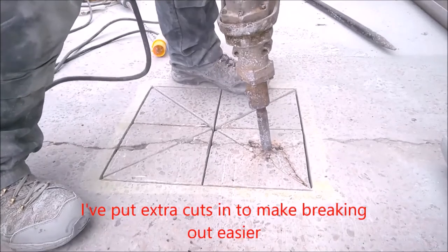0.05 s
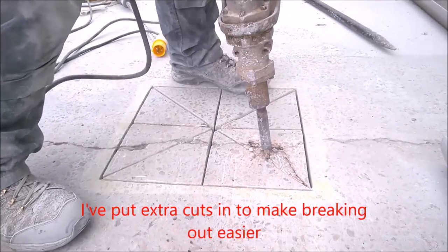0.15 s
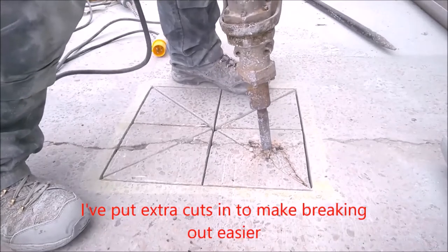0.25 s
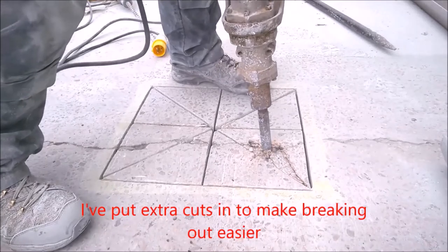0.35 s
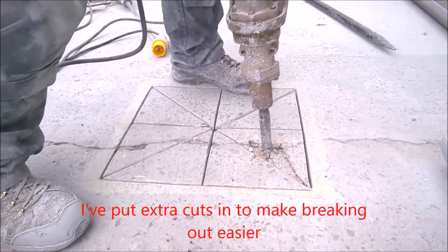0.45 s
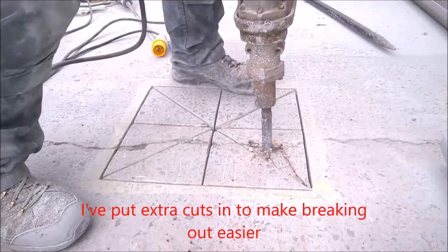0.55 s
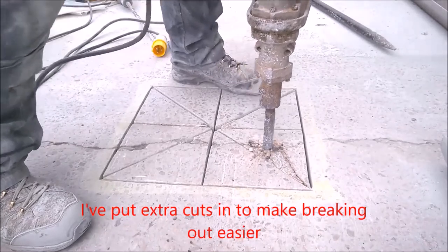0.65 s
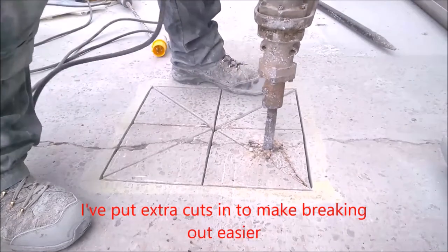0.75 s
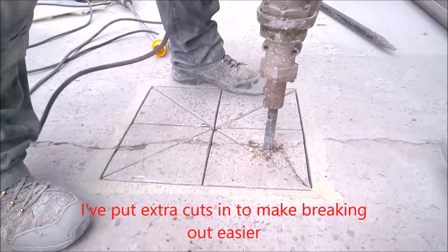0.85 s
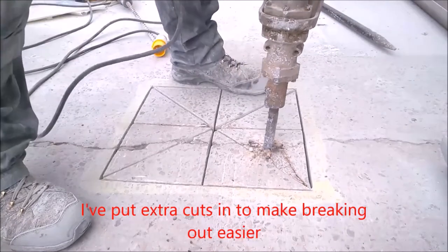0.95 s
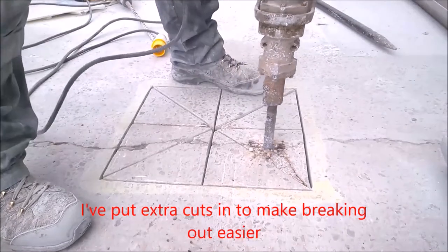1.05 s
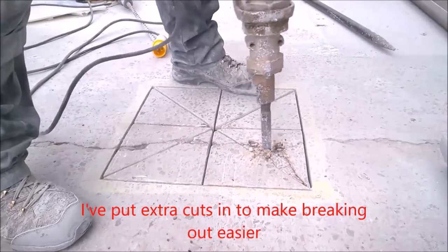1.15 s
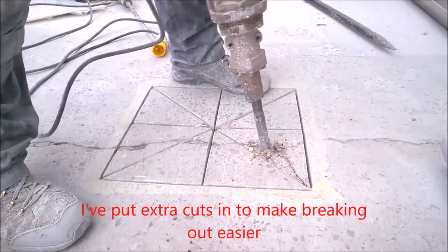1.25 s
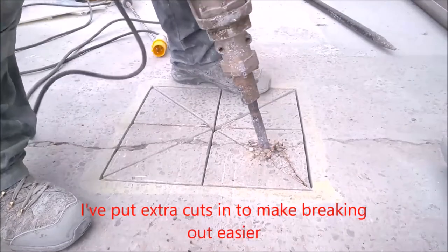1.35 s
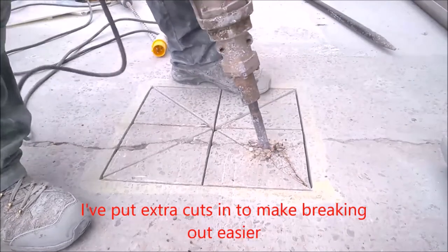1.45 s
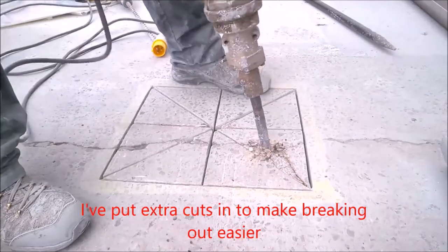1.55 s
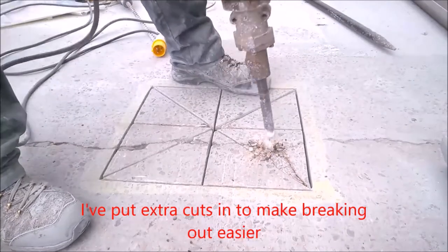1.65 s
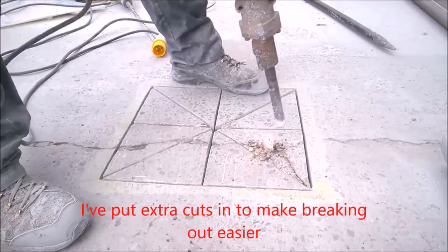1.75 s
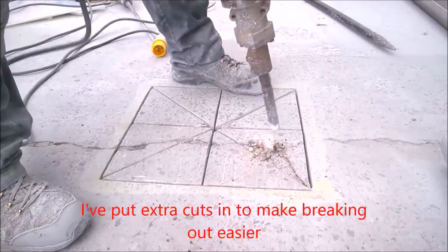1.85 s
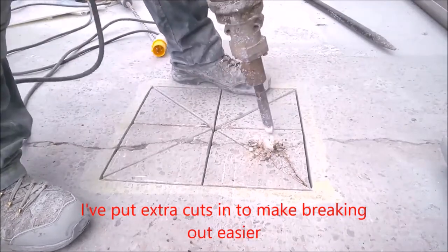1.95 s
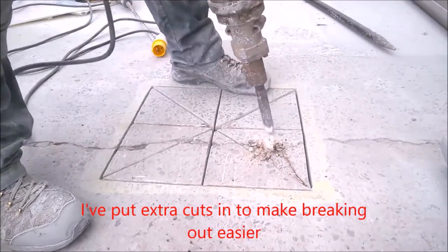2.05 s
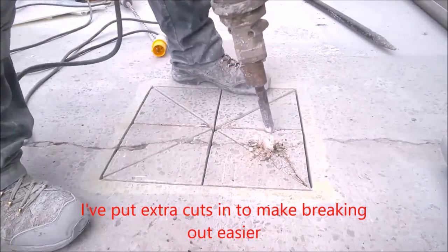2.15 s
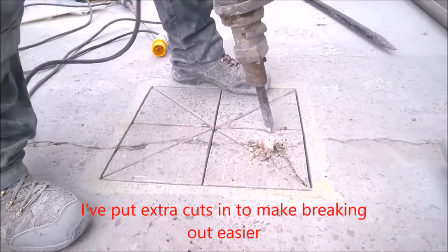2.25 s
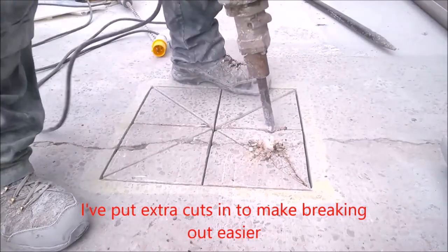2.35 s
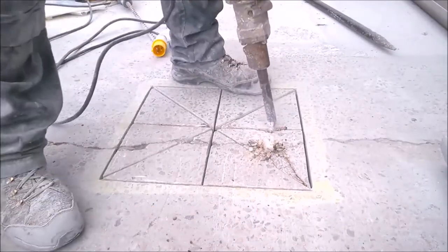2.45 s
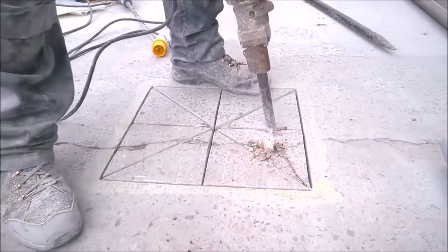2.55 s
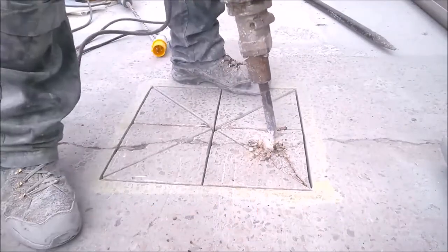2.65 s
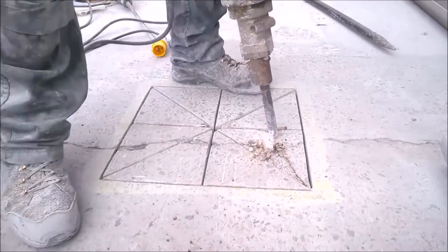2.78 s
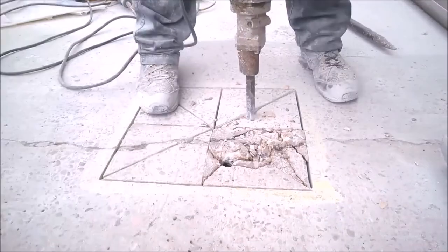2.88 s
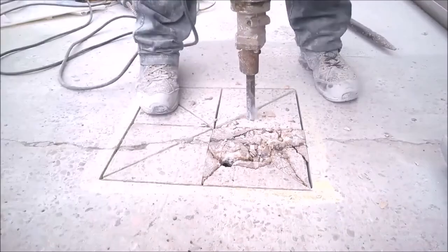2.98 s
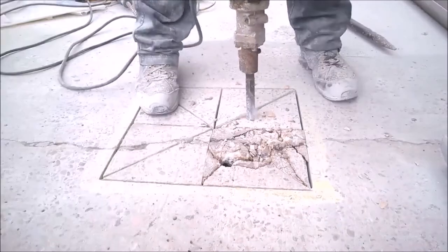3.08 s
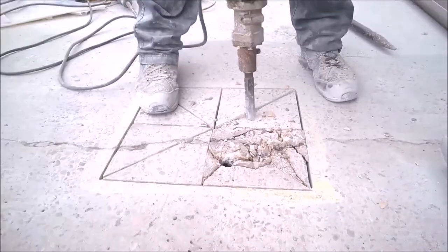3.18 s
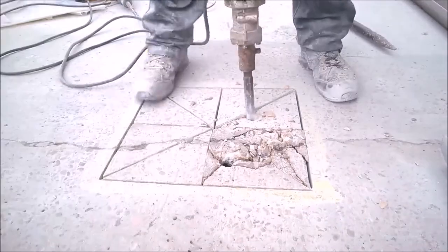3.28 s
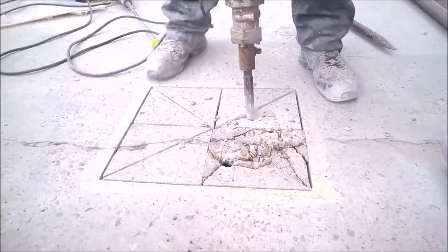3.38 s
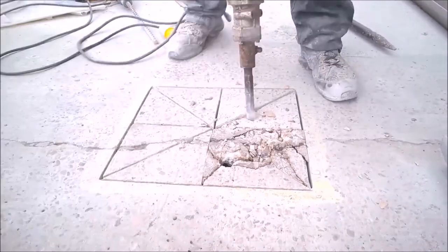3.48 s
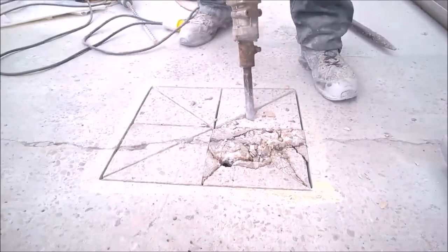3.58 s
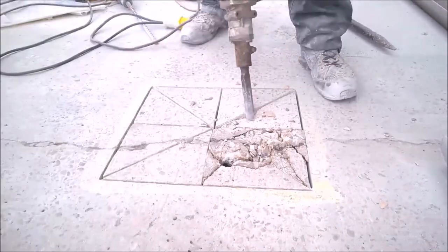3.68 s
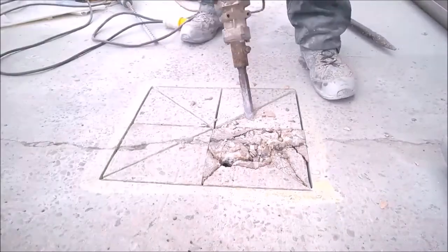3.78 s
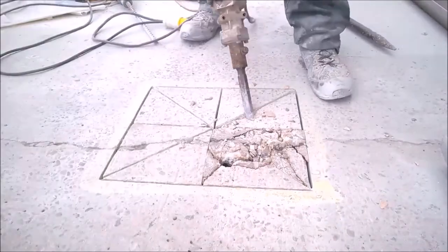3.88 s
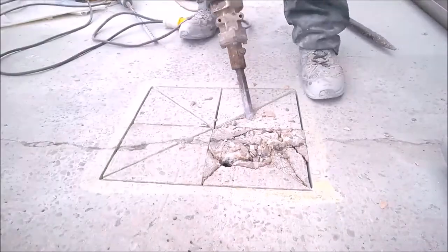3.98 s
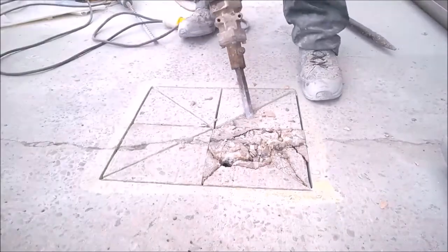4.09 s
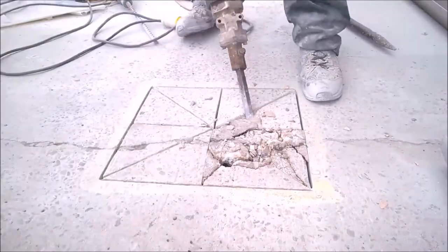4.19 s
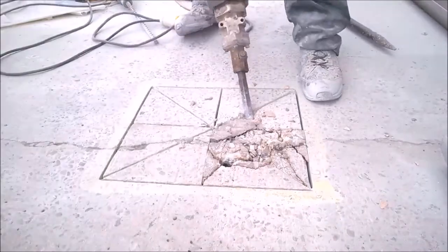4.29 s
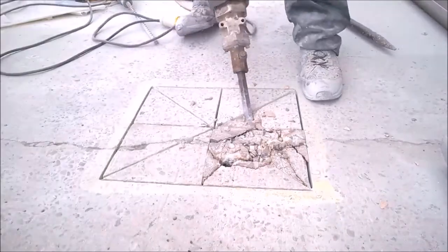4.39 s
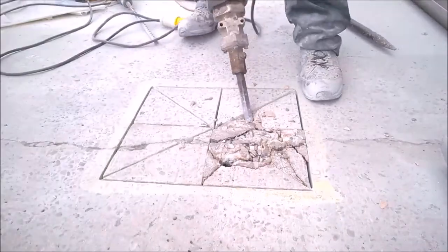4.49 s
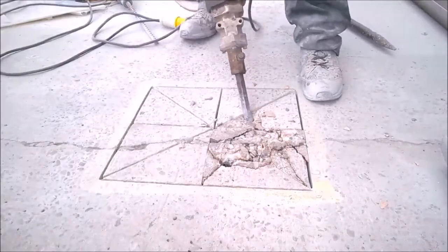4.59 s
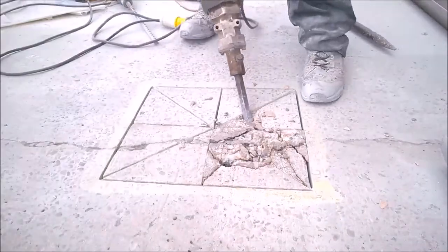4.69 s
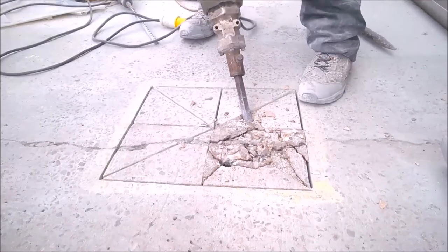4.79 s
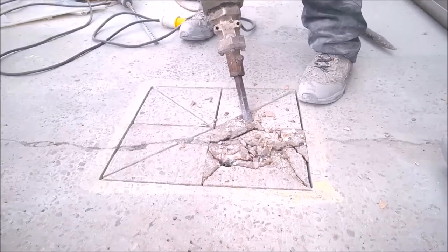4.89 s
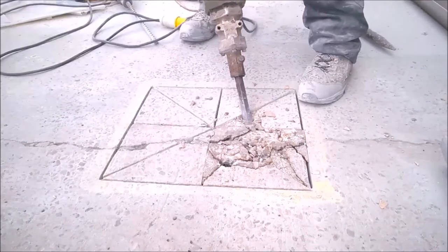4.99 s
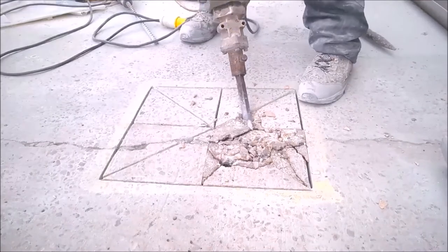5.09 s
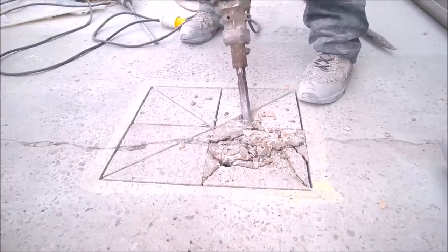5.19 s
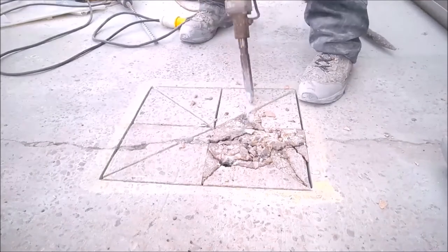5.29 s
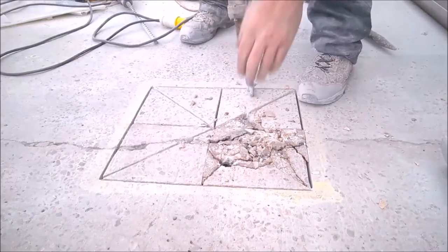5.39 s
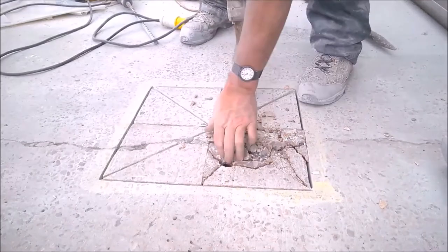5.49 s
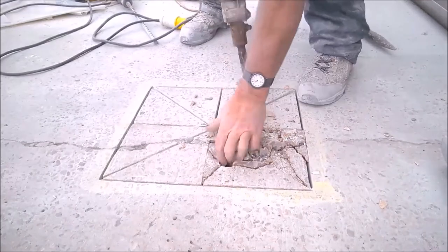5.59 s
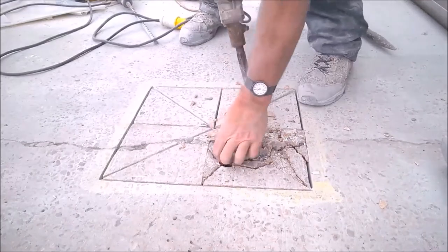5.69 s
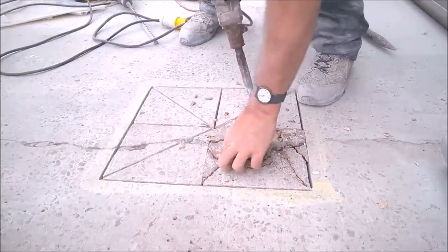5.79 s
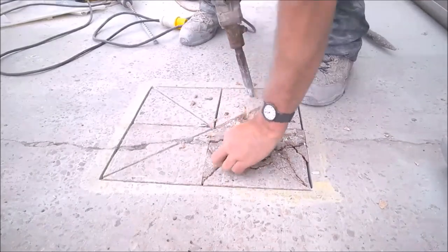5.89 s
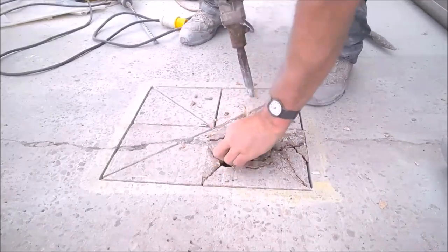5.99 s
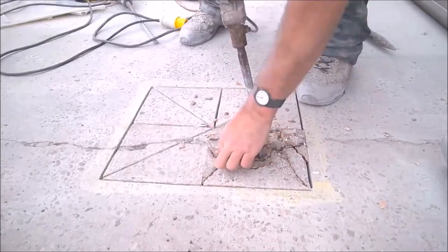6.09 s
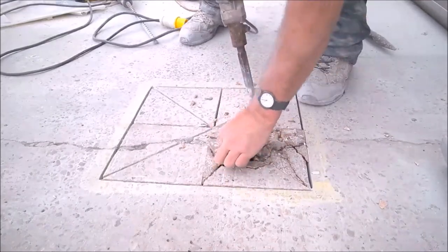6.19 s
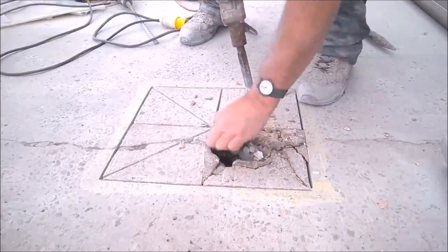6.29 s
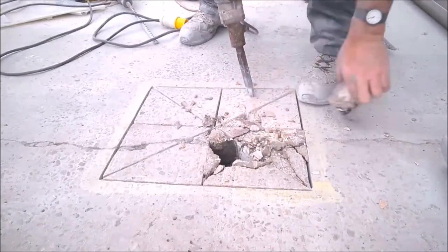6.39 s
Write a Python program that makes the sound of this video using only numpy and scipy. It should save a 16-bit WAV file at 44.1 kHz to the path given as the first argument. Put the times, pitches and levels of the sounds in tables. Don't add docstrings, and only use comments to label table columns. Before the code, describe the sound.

An electric breaker hammers concrete in rapid hard cracks, rattling and whining, falters, hammers again, runs down, then chisel bounces and faint rubble scrapes.

```python
import sys
import numpy as np
from scipy import signal
from scipy.fft import rfft, irfft
from scipy.io import wavfile
from scipy.ndimage import uniform_filter1d

SR = 44100
rng = np.random.default_rng(int(sys.argv[2]) if len(sys.argv) > 2 else 0)


def convert_level_to_amplitude(level_db):
    exponent = np.asarray(level_db, float) / 20
    return 10 ** exponent


def wrap_up_sound(samples):
    columns = np.atleast_2d(samples).T
    tamed = np.clip(columns, -1, 1)
    steps = np.round(tamed * 32767).astype(np.int16)
    wavfile.write(sys.argv[1], SR, steps)


N = 284004

# (time [s], push into the slab [dB], casing shake [dB], dust and fan [dB])
LEAN = [(0, -31, -25.5, -25.5), (1.33, -29.5, -24, -25), (1.45, -44, -27, -23), (1.62, -46, -23.5, -23.5),
        (1.75, -69.5, -26.5, -35), (1.95, -61.5, -31, -31), (2.03, -41.5, -23.5, -20),
        (2.2, -45.5, -28.5, -23), (2.42, -38.5, -32.5, -20), (2.48, -63, -34.5, -35),
        (2.8, -52.5, -34.5, -37), (2.9, -37.5, -31.5, -44), (3.0, -39.5, -38, -28), (4.15, -39, -37, -32),
        (5.0, -47, -37.5, -55.5), (5.2, -46, -49, -59), (5.38, -66, -49, -60), (5.75, -100, -99, -79)]
# (frequency [Hz], level [dB per Hz])
RATTLE_SPECTRUM = [(250, -47.5), (450, -12), (1150, -5), (1800, -2), (3800, -7.5), (6000, -13),
                   (8000, -38.5), (13000, -90.5)]


def evened(x):
    return x / np.sqrt(np.mean(x ** 2) + 1e-20)


def read_spectrum(points, hz):
    f, value = np.transpose(points)
    return np.interp(np.log(hz + 1), np.log(f + 1), value)


def add(mix, s, sound):
    part = mix[..., round(s * SR):][..., :sound.shape[-1]]
    part += sound[..., :part.shape[-1]]


def along(rows, order):
    rows = np.array(rows)
    return np.interp(np.arange(N) / SR, rows[:, 0], rows[:, order])


def spells(rows, t, edge_db_per_s):
    levels = []
    for start, end, db in rows:
        outside = np.maximum(np.maximum(start - t, t - end), 0)
        levels.append(db - edge_db_per_s * outside)
    return np.max(levels, axis=0)


def noise(points):
    # (frequency [Hz], likeness [0-1])
    likeness = [(50, .2), (300, 0.84), (2000, 0.69), (5000, 0.28), (14000, .05)]
    hz = np.fft.rfftfreq(N, 1 / SR)
    a, b = rfft(rng.standard_normal((2, N)))
    same = np.clip(read_spectrum(likeness, hz), 0, 1)
    stereo = np.array([a, same * a + np.sqrt(1 - same ** 2) * b])
    return evened(irfft(stereo * convert_level_to_amplitude(read_spectrum(points, hz)), N))


def resonate(x, hz, width_hz):
    turn = np.exp(2j * np.pi * np.cumsum(hz * np.ones(x.shape[-1])) / SR)
    r = np.exp(-np.pi * width_hz / SR)
    return 2 * (turn * signal.lfilter([1 - r], [1, -r], x / turn)).real


def decays(impulses, seconds):
    return signal.lfilter([1], [1, -np.exp(-1 / (seconds * SR))], impulses)


def train(rows, db):
    out = np.zeros(N)
    out[(np.array(rows)[:, 0] * SR).astype(int)] = convert_level_to_amplitude(db)
    return out


def piston():
    # (first blow [s], last blow [s], blows [count])
    runs = [(.0034, .9885, 33), (1.017, 1.2355, 8), (1.2654, 1.3253, 3), (1.3612, 1.6216, 11),
            (1.644, 1.8121, 8), (1.8371, 1.9384, 5), (1.9628, 1.9838, 2), (2.0172, 2.0721, 3),
            (2.104, 2.2277, 5), (2.9377, 2.9646, 2), (2.9971, 3.1946, 8), (3.2245, 3.3138, 4),
            (3.3413, 3.485, 6), (3.5159, 3.5473, 2), (3.5728, 3.7189, 6), (3.7499, 4.1748, 15),
            (4.2072, 4.2731, 3), (4.3005, 4.3923, 4), (4.4207, 4.535, 5), (4.5594, 4.8982, 13)]
    # (first blow [s], last blow [s], blows [count])
    coasts = [
        (2.2591, 2.4165, 5),
        (4.9276, 5.2778, 10),
    ]
    # (time [s], crack peak [dB], top chisel ring [dB])
    bite = [(0, -10, -27), (.55, -11.5, -28), (.66, -15.5, -34.5), (.99, -18.5, -33.5),
            (1.03, -21.5, -23.5), (1.43, -10.5, -22), (1.65, -7.5, -28.5), (1.96, -8.5, -35.5),
            (2.0, -15, -24), (2.35, -6, -18.5), (3.3, -5, -23.5), (3.5, -8.5, -14.5), (3.78, -6.5, -22),
            (3.95, -10.5, -15.5), (4.3, -14.5, -18), (4.42, -7, -20.5), (4.82, -10, -25.5),
            (5.0, -5, -22.5)]
    # (time [s], crack peak [dB], top chisel ring [dB])
    odd_blows = [(0.0348, -9, -14.5), (0.5885, -10, -11), (0.6189, -2, -30.5), (1.1744, -29, -26),
                 (1.7875, -3.5, -38), (2.0724, -6, -15.5), (2.373, -16.5, -13), (2.471, -4, -34),
                 (2.5151, -5, -38), (2.5617, -4, -30), (2.6155, -4.5, -36), (2.6692, -4.5, -29),
                 (2.7178, -21, -24), (2.7667, -28.5, -44.5), (2.7967, -21.5, -52), (2.849, -2.5, -12.5),
                 (2.9176, -5.5, -18), (3.026, -8, -16), (3.254, -4.5, -15.5), (3.3701, -7, -9),
                 (3.457, -3, -10), (3.6904, -12, -14), (3.9941, -8, -14.5), (4.0544, -31.5, -24),
                 (4.1125, -9, -12), (4.1757, -10.5, -34.5), (4.6712, -3.5, -15), (5.1785, -12, -25),
                 (5.2775, -7.5, -10), (5.391, -5, -38)]
    slowing = 45
    crack_scatter_db, ring_scatter_db, jitter_s = 1.8, 3, .0005

    times = [np.linspace(first, last, count) for first, last, count in runs]
    for first, last, count in coasts:
        span = last - first
        rate = (count - 1) / span + slowing * span / 2
        times.append(first + (rate - np.sqrt(rate ** 2 - 2 * slowing * np.arange(count))) / slowing)
    s = np.concatenate(times)
    at, crack_db, ring_db = np.transpose(bite)
    chance = np.clip(rng.standard_normal((len(s), 3)), -1.5, 1.5)
    crack = np.interp(s, at, crack_db) + crack_scatter_db * chance[:, 0]
    ring = np.interp(s, at, ring_db) + ring_scatter_db * chance[:, 1]
    blows = np.c_[s + jitter_s * chance[:, 2], crack, ring]
    odd = np.array(odd_blows)
    clear = abs(s[:, None] - odd[:, 0]).min(axis=1) > .01
    blows = np.r_[blows[clear], odd]
    return blows[np.argsort(blows[:, 0])]


def shank(s):
    # (start [s], end [s], level [dB])
    middle_spells = [
        (1.12, 1.23, -42),
        (2.17, 2.19, -37),
        (2.36, 2.42, -33.5),
        (2.91, 2.93, -38),
        (3.92, 4.04, -32.5),
        (5.28, 5.3, -43.5),
    ]
    # (start [s], end [s], level [dB])
    length_spells = [
        (1.18, 1.22, -28.5),
        (1.68, 2.1, -22.5),
        (2.12, 2.15, -26.5),
        (2.35, 2.45, -26.5),
        (2.47, 2.69, -18),
        (2.85, 2.87, -20.5),
        (2.91, 2.93, -18.5),
        (3.75, 3.88, -31),
        (4.0, 4.12, -34.5),
        (5.39, 5.41, -18),
    ]
    edge_db_per_s, middle_rest_db, length_rest_db = 500, -53.5, -40.5
    middle_db = max(spells(middle_spells, s, edge_db_per_s), middle_rest_db)
    length_db = max(spells(length_spells, s, edge_db_per_s), length_rest_db)
    octave_db = np.interp(s, (1, 2.4), (-25.5, -45))
    return middle_db, length_db, octave_db


def chisel(blows):
    # (frequency [Hz], level [dB], decay t60 [s])
    top_ring = [(9650, -6, 0.07), (9830, -4, 0.08), (13915, -20, .06), (9965, -12, .05)]
    middle_ring = [(6270, 16.5, 0.39), (8100, -21.5, .05)]
    length_ring = [(2020.5, 2.5, 0.11), (2098, -6, .11)]
    octave_ring = [(4170, 0.0046, 0.3)]
    octave_scatter_db = 9

    out = np.zeros((2, N))
    gaps = np.append(np.diff(blows[:, 0]), .03)
    for (s, crack_db, top_db), gap in zip(blows, gaps):
        t = np.arange(round(min(gap, .06) * SR)) / SR
        free_s = min(gap * rng.uniform(.3, .7), .022)
        edge = np.clip(t / 0.0026, 0, 1) * np.clip((t[-1] - t) / .002, 0, 1)
        choked_db = -1700 * np.maximum(t - free_s, 0)
        top_db -= 5.8 * max(crack_db - 13.0 - top_db, 0)
        middle_db, length_db, octave_db = shank(s + .01)
        octave_db -= octave_scatter_db * 2 * (rng.random() - .3)
        groups = [(top_ring, top_db + 4.0), (middle_ring, middle_db + 0.1),
                  (length_ring, length_db + 2.5), (octave_ring, octave_db - 1.5)]
        for modes, ring_db in groups:
            if modes is length_ring and s == blows[-1, 0]:
                ring_db = ring_db - 1200 * t
            for hz, db, t60 in modes:
                phase, apart, share, load = rng.random(4)
                hz *= 1 + 0.011 * (load - .5)
                spread = .5 * (apart - .5) * min(hz / 4000, 1.8)
                turn = 2 * np.pi * (hz * t + phase + np.array([[0], [spread]]))
                level_db = ring_db + db + 6 * (share - .5) - 60 * t / t60 + choked_db * (hz > 5000)
                add(out, s, convert_level_to_amplitude(level_db) * edge * np.sin(turn))
    scuffed = 1 + 0.58 * evened(uniform_filter1d(rng.standard_normal(N), 40))
    return out * scuffed


def lifted():
    starts_db, leaves_db = -47, -51
    return np.clip((along(LEAN, order=1) - starts_db) / (leaves_db - starts_db), 0, 1)


def loose_db():
    # (start [s], end [s], knock [dB])
    loose_block = [
        (4.55, 4.85, -32.5),
        (4.85, 5.2, -36.5),
    ]
    t = np.arange(N) / SR
    return spells(loose_block, t, 28) - 150 * np.maximum(t - loose_block[-1][1], 0)


def crack_hz(blows):
    seated_hz, lifted_hz, block_hz = 3700, 6400, 2800
    on_block = np.clip((loose_db() + 47) / 9, 0, 1)
    seated = seated_hz + (block_hz - seated_hz) * on_block
    scatter = np.exp(.22 * rng.standard_normal(len(blows) + 1))
    seated = seated * scatter[np.searchsorted(blows[:, 0], np.arange(N) / SR)]
    return seated + (lifted_hz - seated) * lifted()


def cracks(blows):
    # (frequency [Hz], level [dB per Hz])
    crack_spectrum = [(180, -45), (300, -10.5), (2000, -13), (2650, -11), (3350, -6), (8790, -5),
                      (10000, -6), (16000, -10.5)]
    hits, raw = train(blows, blows[:, 1]), noise(crack_spectrum)
    late_s, weak_db = rng.uniform([.003, 10], [.008, 22], (len(blows), 2)).T
    rebounds = train(blows + late_s[:, None], blows[:, 1] - weak_db)
    hz = crack_hz(blows)
    coloured = raw + 1.8 * evened(resonate(resonate(raw, hz, 2300), hz, 1900))
    coloured /= np.sqrt(uniform_filter1d(coloured ** 2, 90))
    burst = decays(decays(hits + rebounds, .0011), .0005) / 22
    grit = raw * decays(decays(hits, 0.011), 0.0013) / 44
    return convert_level_to_amplitude(-2.0) * coloured * burst + convert_level_to_amplitude(-17.5) * grit


def slab(blows):
    # (frequency [Hz], width [Hz], level [dB])
    floor_modes = [
        (120, 50, 0),
        (249, 26, 2),
        (339, 12, -7),
        (60, 30, -11),
    ]
    block_under_shake_db, block_lift_db = -26, -22.5
    hits = train(blows, rng.uniform(-2.5, 2.5, len(blows)))
    thump = sum(convert_level_to_amplitude(db) * resonate(hits, hz, width) / width for hz, width, db in floor_modes)
    rumble = noise([(20, -11), (250, -10.0), (500, -2.0), (900, -17)])
    floor = 0.58 * evened(thump) + 0.83 * rumble
    block = resonate(resonate(hits, 783, 300), 820, 490)
    shaken_db = along(LEAN, order=2) + block_under_shake_db + block_lift_db * lifted()
    block_db = np.maximum(shaken_db, loose_db())
    return convert_level_to_amplitude(along(LEAN, order=1)) * floor + convert_level_to_amplitude(block_db) * evened(block)


def casing(blows):
    # (frequency [Hz], level [dB per Hz])
    hiss_spectrum = [(1470, -12), (2500, -6), (3260, -0.5), (3890, -14.5), (4240, -7.5), (16000, -15)]
    shake = 1.5 + evened(decays(train(blows, 0 * blows[:, 0]), .004))
    struck = rng.random(N) < 500 / SR
    knocks = convert_level_to_amplitude(4 * np.minimum(rng.exponential(1, N), 2.5)) * struck
    chatter = evened(noise(RATTLE_SPECTRUM) * (0.8 + evened(decays(knocks, 0.002))) * shake)
    hiss = noise(hiss_spectrum) * (0.46 + 0.43 * evened(decays(knocks, 0.001)))
    return convert_level_to_amplitude(along(LEAN, order=2) + 5.0) * chatter + convert_level_to_amplitude(along(LEAN, order=3)) * hiss


def gears():
    # (time [s], frequency [Hz], level [dB])
    whine = [(0, 3195, -28.5), (1.15, 3152, -28.5), (1.33, 3198, -25.5), (1.53, 3793, -24.5),
             (1.74, 4150, -28), (2.01, 3630, -31.5), (2.1, 3570, -31.5), (2.2, 3210, -62),
             (2.95, 3200, -59.5), (3.25, 3440, -40), (3.54, 3385, -37), (3.87, 3240, -39.5),
             (4.25, 3194, -53), (4.45, 3330, -47), (4.9, 3320, -50.5), (5.2, 2480, -120)]
    pitch_wobble, level_wobble = evened(uniform_filter1d(rng.standard_normal((2, N)), 700))
    turn = 2 * np.pi * np.cumsum(along(whine, order=1) + 22 * pitch_wobble) / SR
    level_db = along(whine, order=2) + 4.0 + 3 * level_wobble
    return convert_level_to_amplitude(level_db) * np.sin(turn + np.array([[0], [.6]]))


def walls(x, t60=.2):
    length = SR // 2
    taps = np.zeros((2, length))
    slots = np.arange(300, length - 20, 20)
    at = slots + rng.integers(0, 20, (2, len(slots)))
    np.put_along_axis(taps, at, rng.choice([-1., 1.], at.shape), 1)
    tail = signal.lfilter([1], [1, -.75], taps * convert_level_to_amplitude(-60 * np.arange(length) / SR / t60))
    return signal.fftconvolve(x, tail / np.linalg.norm(tail[0]), axes=1)[:, :N]


def site():
    # (frequency [Hz], level [dB per Hz])
    site_spectrum = [(15, -60), (30, -26), (175, -1.5), (242, -12), (600, -27), (1330, -35), (3000, -40),
                     (16000, -53.5)]
    # (frequency [Hz], level [dB rms])
    hum = [
        (672.9, -85.5),
        (1324, -82.5),
    ]
    t = np.arange(N) / SR
    tones = sum(convert_level_to_amplitude(db) * np.sqrt(2) * np.sin(2 * np.pi * hz * t) for hz, db in hum)
    throb = 1 + 0.24 * evened(uniform_filter1d(rng.standard_normal(N), 900))
    return convert_level_to_amplitude(-64) * noise(site_spectrum) * throb + tones


def small_sounds():
    # (time [s], peak [dB], centre [Hz])
    ticks = [(5.343, -20, 2093), (5.4054, -25, 7920), (5.4215, -28, 7950), (5.457, -24, 8170),
             (5.4783, -21, 8150), (5.501, -29, 5400), (5.5307, -27, 7900), (5.5652, -31.5, 7990),
             (5.6057, -35.5, 3200), (5.6613, -37.5, 7980), (5.7154, -51, 3420), (5.7602, -49, 5080),
             (6.0272, -54, 2790), (6.0654, -66, 3210), (6.1002, -57, 3080), (6.2799, -49, 6300),
             (6.3026, -47, 3070)]
    # (time [s], length [s], level [dB], centre [Hz], width [Hz])
    scrapes = [
        (6.157, .11, -60, 6460, 900),
        (6.156, 0.054, -67, 8700, 1200),
        (6.152, 0.065, -59.5, 570, 600),
        (6.157, .06, -65.5, 3700, 2500),
        (6.378, 0.045, -59, 5300, 6400),
        (2.7, 0.16, -30.5, 1750, 430),
        (4.3, .22, -50, 4000, 120),
        (6.2, .2, -60.5, 160, 210),
        (6.022, 0.018, -68, 4200, 6000),
        (5.83, .09, -75, 6300, 1080),
    ]
    # (time [s], level [dB], frequency [Hz])
    knocks = [
        (2.255, -19, 44),
        (2.261, -20, 140),
        (1.47, -32.5, 35),
        (1.8, -43, 40),
        (2.53, -32, 30),
        (5.28, -18, 420),
        (1.3, -23, 260),
        (3.4, -13.5, 120),
    ]
    out, t = np.zeros((2, N)), np.arange(3000) / SR
    grit = noise([(1500, -6), (5000, -2.5), (15000, -6.5)])
    for s, db, hz in ticks:
        burst = grit[:, round(s * SR):][:, :len(t)] * (np.exp(-t / 0.0016) + 0.21 * np.exp(-t / 0.017))
        add(out, s, convert_level_to_amplitude(db - 9.5) * (burst + 1.55 * resonate(burst, hz, 900)))
    for s, length, db, hz, width in scrapes:
        raw = rng.standard_normal((2, round(length * SR)))
        body = evened(resonate(resonate(raw + raw[0], hz, width), hz, width)) + 0.12 * raw
        fade = signal.windows.tukey(raw.shape[1], .3) * np.linspace(1, .4, raw.shape[1])
        add(out, s, convert_level_to_amplitude(db) * body * fade)
    for s, db, hz in knocks:
        add(out, s, convert_level_to_amplitude(db) * np.sin(2 * np.pi * hz * t) * np.exp(-t * hz / 0.28) * np.ones((2, 1)))
    return out


def panel():
    # (start [s], end [s], level [dB])
    wrenches = [
        (1.47, 1.58, -22.5),
        (1.98, 2.1, -27),
    ]
    hz, width_hz, edge_db_per_s = 1160, 420, 88.5
    boom = evened(resonate(resonate(noise(RATTLE_SPECTRUM), hz, width_hz), hz, width_hz))
    return convert_level_to_amplitude(spells(wrenches, np.arange(N) / SR, edge_db_per_s)) * boom


def scene():
    blows = piston()
    near = chisel(blows) + cracks(blows) + slab(blows) + casing(blows)
    near = near + panel() + gears() + small_sounds()
    balance = convert_level_to_amplitude([[.4], [-.4]])
    return (near + convert_level_to_amplitude(-14.5) * walls(near)) * balance + site()


def roll_off(x):
    return signal.sosfilt(signal.butter(12, 17030, fs=SR, output="sos"), x)


def record(dry):
    soft = 1.15 * np.tanh(dry / 1.05)
    lowpass = signal.firwin(511, 16000, window=("kaiser", 9), fs=SR)
    mix = signal.oaconvolve(soft, lowpass[None], "same")
    return roll_off(mix)


dry = scene()
out = record(dry)
wrap_up_sound(out)
```